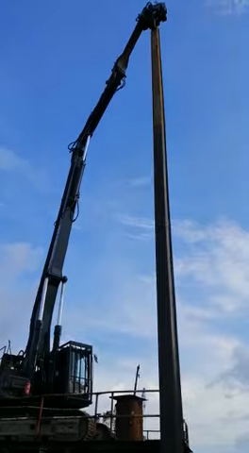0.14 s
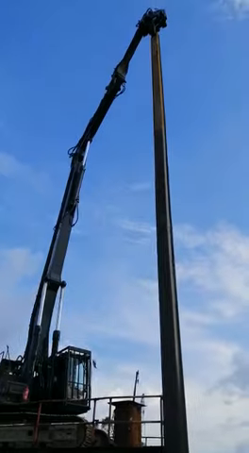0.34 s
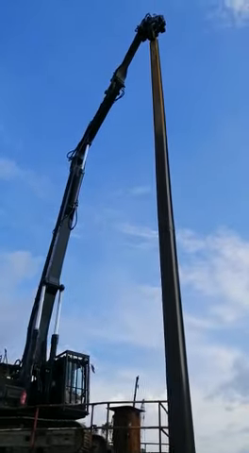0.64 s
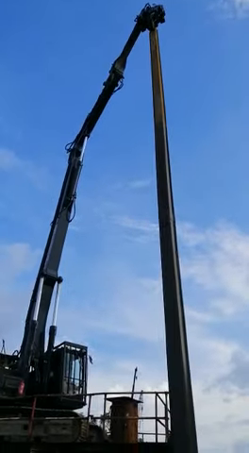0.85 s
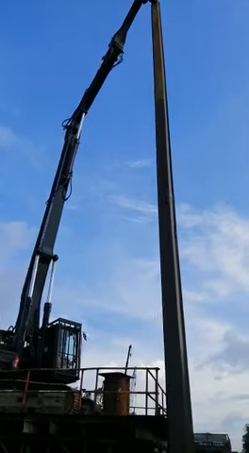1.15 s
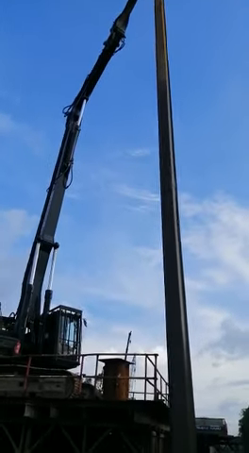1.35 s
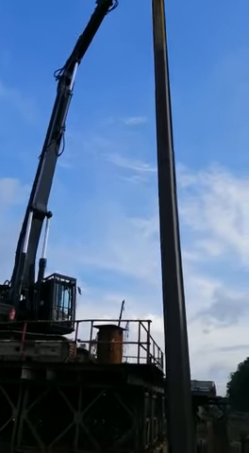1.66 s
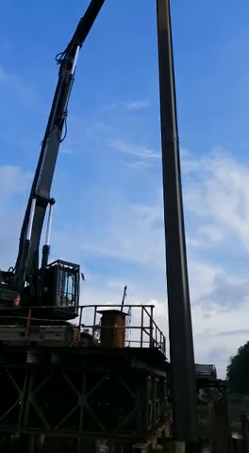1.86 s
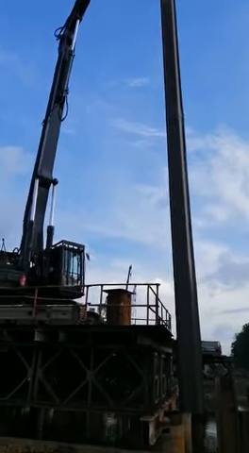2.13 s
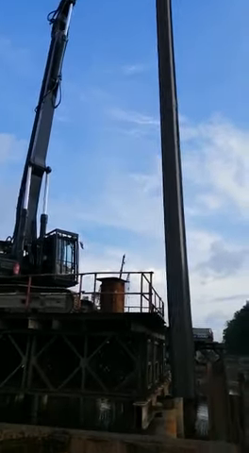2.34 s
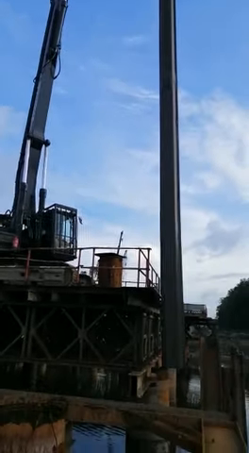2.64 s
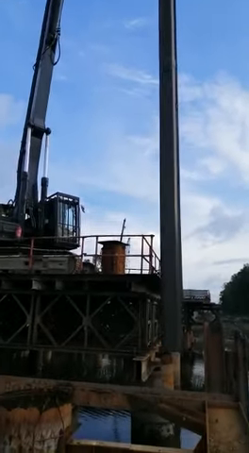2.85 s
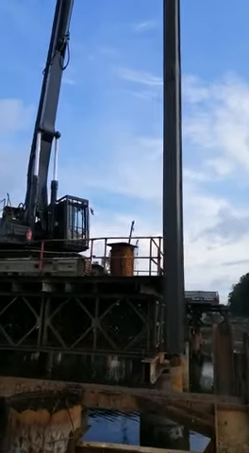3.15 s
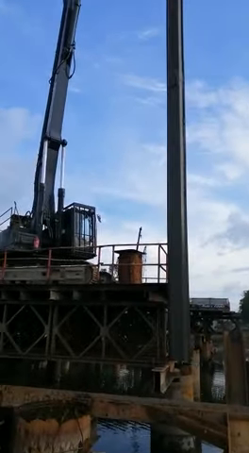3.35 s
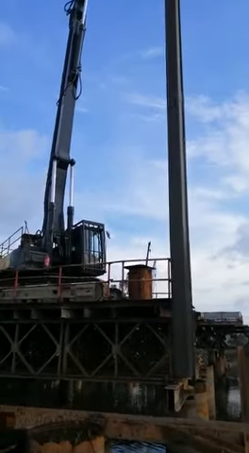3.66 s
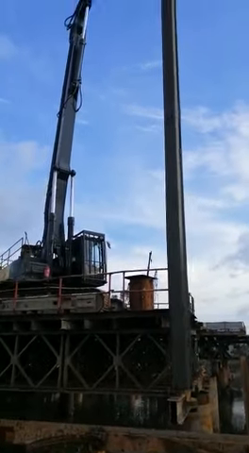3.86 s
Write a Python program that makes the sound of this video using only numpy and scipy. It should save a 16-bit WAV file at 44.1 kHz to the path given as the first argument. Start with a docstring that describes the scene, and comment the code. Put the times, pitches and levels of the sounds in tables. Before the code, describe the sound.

An excavator engine drones outdoors by the water, cutting in abruptly after brief silence; it dips, swells with pump whine and pile-hammer hum, then the whine sags. Stereo microphone on the bank, sound leaning right.

```python
"""The diesel of an excavator throbs and roars while the machine holds a vibrating hammer on a tall
steel pile beside the water, heard from the bank: firing orders as sines, rumble and roar as noise.
The hydraulic pump whines in sines and sags near the end; the hammer hums through the pile in sines.
Steel panels buzz and oil hisses in the valves as coloured noise; narrow resonances add ringing tones.
The microphone opens after a short silence."""
import sys
import numpy as np
from scipy import signal
from scipy.fft import rfft, irfft
from scipy.io import wavfile

SR = 44100
rng = np.random.default_rng(int(sys.argv[2]) if len(sys.argv) > 2 else 0)


def store_wav(level_fs):
    """Save 16-bit WAV to argv[1]."""
    pcm = np.round(np.clip(np.atleast_2d(level_fs), -1, 1) * 32767)
    wavfile.write(sys.argv[1], SR, pcm.T.astype(np.int16))


N = 176400  # 4 s


def from_db(db):
    """Gain of a level in dB."""
    return 10 ** (np.asarray(db) / 20)


def rms_one(x):
    """Scale to rms 1."""
    return x / np.sqrt(np.mean(x ** 2) + 1e-20)


def in_time(rows):
    """Columns of a breakpoint curve, each drawn out to one value per sample."""
    s, *columns = np.transpose(rows)
    t = np.arange(N) / SR
    return [np.interp(t, s, column) for column in columns]


def at_hz(points, hz):
    """A spectrum curve read on a log frequency axis."""
    point_hz, value = np.array(points).T
    return np.interp(np.log(hz), np.log(point_hz), value)


def drift(rate_hz):
    """Slow random wander of rms 1: noise through a double pole, made at 1/40 of the sample rate."""
    step = 40
    r = np.exp(-2 * np.pi * rate_hz * step / SR)
    settle = 2000  # filter start-up, thrown away
    white = rng.standard_normal(N // step + settle + 2)
    slow = signal.lfilter([1], [1, -2 * r, r * r], white)[settle:]
    return np.interp(np.arange(N) / step, np.arange(len(slow)), rms_one(slow))


def placed(db):
    """Left and right gains for a left-minus-right level in dB."""
    return from_db(np.array([db / 2, -db / 2]))


def ringing(modes, swell_db=3.0):
    """Noise through narrow resonances that swell and fade, partly shared by the two sides."""
    out = 0
    for hz, width_hz, db, lean_db in modes:
        r = np.exp(-np.pi * width_hz / SR)
        poles = [1, -2 * r * np.cos(2 * np.pi * hz / SR), r * r]
        shared, *own = rng.standard_normal((3, N))
        rung = signal.lfilter([1, 0, -1], poles, shared + 1.03 * np.array(own))
        swell = from_db(db + swell_db * drift(2.5))
        out = out + swell * placed(lean_db)[:, None] * rms_one(rung)
    return out


# How alike the two sides of the noise are: f/Hz, likeness (0 to 1)
STEREO_LIKENESS = [(60, .95), (240, .93), (470, .85), (930, .62), (1500, .5), (2400, .5), (3700, .35),
                   (5500, .48), (8000, .33), (12000, .15)]
# Stereo tilt of the spectrum, for noise and tones: f/Hz, left minus right level/dB
STEREO_LEAN = [(60, -1.5), (78, 3), (100, -5), (130, -1.0), (170, 1.5), (220, -2.0), (290, -5.5), (370, 0),
               (480, -7.5), (630, 2.5), (810, -11), (1060, -1), (1370, -4), (1780, -7.5), (2310, -7.5),
               (3000, -5), (3890, 7.5), (5050, -8), (6550, -5), (8510, -1), (11000, 10), (14300, 1)]


def noise(colour, course, lag_s, patchy_db, patch_rate, modes=()):
    """Coloured stereo noise in third-octave bands that flicker partly together; the right side lags by lag_s."""
    hz = np.arange(N // 2 + 1) * SR / N + 1e-3  # keeps log(0) away
    low, high = colour[0][0], colour[-1][0]

    # two sides with the wanted likeness and tilt
    alike = np.clip(at_hz(STEREO_LIKENESS, hz), 0, 1)
    mid, side = rfft(rng.standard_normal((2, N)))
    pair = np.sqrt(1 + alike) * mid + np.sqrt(1 - alike) * side * [[1], [-1]]
    pair = pair * placed(at_hz(STEREO_LEAN, hz))

    # colour, steep skirts beyond its ends, and the delay on the right
    skirts = 1 / (1 + (low / hz) ** 16) / (1 + (hz / high) ** 16)
    late = np.exp(-2j * np.pi * hz * lag_s * np.array([[0], [1]]))
    pair = pair * from_db(at_hz(colour, hz)) * np.sqrt(skirts) * late

    # overlapping third-octave bands, each with its own flicker over a common one
    count = int(np.ceil(3 * np.log2(high / low)))
    place = np.clip(3 * np.log2(hz / low), 0, count)
    together = drift(patch_rate / 2)
    out = 0
    for band in range(count + 1):
        share = np.clip(1 - abs(place - band), 0, 1)
        flicker = from_db(patchy_db * (0.83 * together + drift(patch_rate)))
        out = out + flicker * irfft(pair * share, N)

    level_db, side_db = in_time(course)
    out = out / np.sqrt(np.mean(out.mean(axis=0) ** 2))  # the average of the sides at rms 1
    out = out + ringing(modes)
    # the stereo course moves about its own mean, the fixed tilt is already in
    return from_db(level_db) * placed(side_db - side_db.mean()) * out


TONE_LEAD_S = .00008  # the right side runs ahead


def tones(pitch_hz, orders, wobble_db):
    """Sines on multiples of one turning rate, levels wavering; the right side runs slightly ahead."""
    turns = np.cumsum(pitch_hz) / SR
    side_turns = turns + pitch_hz * TONE_LEAD_S * np.array([[0], [1]])
    out = 0
    for multiple, db in orders:
        phase = 2 * np.pi * (multiple * side_turns + rng.random())
        lean = placed(at_hz(STEREO_LEAN, multiple * pitch_hz.mean()))[:, None]
        level = np.sqrt(2) * from_db(db + wobble_db * drift(9.7))  # dB are rms
        out = out + level * lean * np.sin(phase)
    return out


# Exhaust rumble spectrum: f/Hz, level/dB (per Hz)
RUMBLE_SPECTRUM = [(35, -34), (60, -3), (108, -0.5), (167, -0.5), (231, 2.5), (289, -5), (430, -9.5),
                   (520, -31.5), (680, -26), (1140, -120)]
# Exhaust rumble course: t/s, level/dB, left minus right level/dB (about its mean)
RUMBLE_COURSE = [(.42, -30, -2.5), (.9, -35, -2), (1.3, -32.5, -9.5), (1.7, -24.5, -1), (2.3, -27, -4),
                 (2.8, -27.5, -4), (3.4, -27.5, -1), (4.0, -30, -3.5)]


def exhaust_rumble():
    """Low exhaust noise of the diesel, shaped by its spectrum."""
    return noise(RUMBLE_SPECTRUM, RUMBLE_COURSE, lag_s=.00002, patchy_db=-0.57, patch_rate=6.5)


FIRING_HZ, FIRING_WAVER = 92.8, .0012  # firing rate, rms share it wanders by
# Engine orders: multiple of the firing rate, level/dB
FIRING_ORDERS = [(1.0, -1), (1.67, -8), (2.0, -9), (2.58, -4), (3.33, -7.5), (8.0, -17), (8.5, -16.5),
                 (9.0, -12), (10.17, -16.5)]
# Engine throb course: t/s, level/dB
THROB_COURSE = [(.42, -38), (1.0, -36.5), (1.7, -31.5), (2.4, -33.5), (2.9, -39.5), (4.0, -41)]


def diesel_throb():
    """Firing orders as sines on whole and broken multiples of a nearly steady firing rate."""
    firing_hz = FIRING_HZ * (1 + FIRING_WAVER * drift(3.2))
    return from_db(*in_time(THROB_COURSE)) * tones(firing_hz, FIRING_ORDERS, wobble_db=2.5)


# Fan roar spectrum: f/Hz, level/dB (per Hz)
ROAR_SPECTRUM = [(290, -8), (500, -3), (579, -5), (648, -2.5), (706, -5), (860, -4.5), (1030, -8),
                 (1470, -7.5), (1680, -15.5), (2180, -51), (3700, -120)]
# Fan roar course: t/s, level/dB, left minus right level/dB (about its mean)
ROAR_COURSE = [(0.45, -37, -7.5), (0.48, -37, -7.5), (0.94, -40.5, -4.5), (1.38, -37, -12.5),
               (1.58, -32, -6.5), (3.0, -32.5, -7), (3.4, -37, -10), (3.93, -38.5, -10), (4.0, -38.5, -8)]


def fan_roar():
    """Broad mid-range noise of the fan."""
    return noise(ROAR_SPECTRUM, ROAR_COURSE, lag_s=.00006, patchy_db=-0.08, patch_rate=19.0)


# Panel buzz spectrum: f/Hz, level/dB (per Hz)
BUZZ_SPECTRUM = [(990, -22), (1680, -5), (2080, -1), (2220, -1), (3030, -9), (3570, -14.5), (3800, -20),
                 (4940, -16), (8360, -120)]
# Panel buzz course: t/s, level/dB, left minus right level/dB (about its mean)
BUZZ_COURSE = [(0.45, -42, -6.5), (1.02, -45.5, -5), (1.34, -41.5, -9), (1.64, -37.5, -7.5),
               (2.25, -39, -9), (3.36, -42.5, -9), (3.83, -43, -11), (3.93, -43.5, -3.5), (4.0, -44.5, -10)]
# Steel panel resonances riding on the buzz: f/Hz, width/Hz, level/dB (re buzz), left minus right level/dB
PANEL_MODES = [(1310, 10, -17, -3), (1763, 8, -19, -5), (2054, 10, -22, -6), (2150, 4, -14, -6),
               (2258, 8, -22, -6), (2676, 10, -24, -6)]


def panel_buzz():
    """Steel panels as bright noise with narrow resonances that follow its level."""
    return noise(BUZZ_SPECTRUM, BUZZ_COURSE, lag_s=.0003, patchy_db=.9, patch_rate=16.0, modes=PANEL_MODES)


SHAFT_SHARE, RATTLE_DEPTH = .25, .11  # one rattle every four pump strokes


def shaft_rattle():
    """Gain that pulses at a quarter of the pump pitch with a wandering phase, rms 1."""
    pump_hz = in_time(PUMP_COURSE)[0]
    turns = np.cumsum(SHAFT_SHARE * pump_hz) / SR + .08 * drift(6.0)
    return rms_one(1 + RATTLE_DEPTH * np.cos(2 * np.pi * turns))


def engine():
    """Firing orders over exhaust rumble, with fan roar and panel buzz pulsing in the shaft rattle."""
    return exhaust_rumble() + diesel_throb() + (fan_roar() + panel_buzz()) * shaft_rattle()


# Hydraulic pump course: t/s, pitch f/Hz, fundamental level/dB, overtones level/dB
PUMP_COURSE = [(.42, 222.8, -46, -40), (1.0, 222.8, -44, -40), (1.4, 222.8, -35, -35),
               (2.0, 222.8, -32, -36), (2.6, 222.8, -30, -36), (2.95, 221.5, -28, -34),
               (3.04, 218, -30, -50), (3.14, 209, -33, -56), (3.2, 202, -30.5, -58), (3.42, 195, -32, -60),
               (3.52, 192, -39, -62), (4.0, 190, -37, -62)]
# Pump overtones: multiple of the pitch, level/dB
OVERTONES = [(.5, -3), (2, -.8), (3, -12), (4, -12.5), (5, -20), (9, -19.5)]


def pump_whine():
    """Pump strokes as a fundamental and overtones on one wavering pitch that sags near the end."""
    pitch_hz, first_db, over_db = in_time(PUMP_COURSE)
    pitch_hz = pitch_hz * (1 + .004 * drift(5.0))
    fundamental = from_db(first_db) * tones(pitch_hz, [(1, 0)], wobble_db=3.0)
    overtones = from_db(over_db) * tones(pitch_hz, OVERTONES, wobble_db=1.8)
    return fundamental + overtones


HAMMER_HZ, HAMMER_WAVER = 32.5, 0.0061  # turning rate, rms share it wanders by
# Hammer orders: multiple of the turning rate, level/dB
WEIGHT_ORDERS = [(2, -13), (4, -2.5), (10, -8.5), (11, -10.5)]
# Hammer hum course: t/s, level/dB
HUM_COURSE = [(.42, -35.5), (1.2, -39), (1.8, -31.5), (2.6, -30), (3.05, -34), (3.15, -29.5), (3.45, -32),
              (3.6, -38), (4.0, -35)]


def hammer_hum():
    """Spinning weights hum through the pile as sines on multiples of their turning rate."""
    turning_hz = HAMMER_HZ * (1 + HAMMER_WAVER * drift(1.43))
    return from_db(*in_time(HUM_COURSE)) * tones(turning_hz, WEIGHT_ORDERS, wobble_db=2.5)


# Broad hiss spectrum: f/Hz, level/dB (per Hz)
HISS_SPECTRUM = [(2180, -42), (3700, 1), (3830, -8.5), (4430, -1.5), (4800, -6), (5620, 2), (6090, -4.5),
                 (6800, 0), (8520, -9), (9570, -12), (10200, -14.5), (10900, -10.5), (12000, -14),
                 (12900, -21), (13800, -19), (14800, -29)]
# Broad hiss course: t/s, level/dB (before a 3 dB lift), left minus right level/dB (about its mean)
HISS_COURSE = [(0.45, -50, -1), (0.49, -51.5, -1), (0.97, -56, -2), (1.32, -50.5, -5.5), (2.33, -47.5, -3),
               (2.44, -51, -5), (3.0, -50, -5), (3.86, -51, -4.5), (4.0, -52, -3)]


def broad_hiss():
    """Wide treble hiss of the hydraulics, lifted by 3 dB."""
    return from_db(3.0) * noise(HISS_SPECTRUM, HISS_COURSE, lag_s=0.000617, patchy_db=1.2, patch_rate=11.5)


# Valve hiss spectrum: f/Hz, level/dB (per Hz)
VALVE_SPECTRUM = [(2820, -13), (4800, -8.5), (5360, -1), (5450, 0.5), (5690, 4), (5840, 2.5), (6300, -6),
                  (8190, -31), (13900, -120)]
# Valve hiss course: t/s, level/dB, left minus right level/dB (about its mean)
VALVE_COURSE = [(.42, -57, 4), (1.3, -59, -5), (1.6, -49, -6), (2.2, -50, -14), (2.6, -50, -14),
                (3.2, -45.5, -5), (4.0, -51, -17.5)]


def valve_hiss():
    """Oil hissing in the valves as a band of noise."""
    return noise(VALVE_SPECTRUM, VALVE_COURSE, lag_s=.00037, patchy_db=.9, patch_rate=18.0)


# Ground and deck shudder spectrum: f/Hz, level/dB (per Hz)
SHUDDER_SPECTRUM = [(22.0, -2), (34.0, -5), (50.0, -1), (62.0, 1)]
# Shudder course: t/s, level/dB, left minus right level/dB (about its mean)
SHUDDER_COURSE = [(.42, -65, -2), (1.0, -51, -2), (1.7, -42.5, -2), (2.8, -47, -2), (3.4, -43, -2),
                  (4.0, -37.5, -2)]


def ground_shudder():
    """Deep shudder of ground and deck as very low noise without band flicker."""
    return noise(SHUDDER_SPECTRUM, SHUDDER_COURSE, lag_s=0, patchy_db=0.0, patch_rate=6.7)


# Resonances of the ringing tones: f/Hz, width/Hz, level/dB (re course), left minus right level/dB
RINGING_MODES = [(5638, 7, -1, -7), (5625, 30, -5, -7), (5110, 12, -7, -7), (3572, 20, -3, -1),
                 (1424, 8, 2.5, -4), (1519, 8, 1.5, -5)]
# Ringing tones course: t/s, level/dB
RINGING_COURSE = [(1.3, -68), (1.6, -55), (2.0, -56), (2.5, -55), (2.95, -50.5), (3.3, -55), (3.55, -52),
                  (4.0, -54)]


def faint_ringing_tones():
    """Faint ringing tones, two near 1.5 kHz and others at 3.6 to 5.6 kHz: noise through narrow resonances."""
    return from_db(*in_time(RINGING_COURSE)) * ringing(RINGING_MODES, swell_db=1.2)


def scene():
    """All machines together, with the ringing tones."""
    hydraulics = pump_whine() + broad_hiss() + valve_hiss()
    hammer = hammer_hum() + ground_shudder()
    return engine() + hydraulics + hammer + faint_ringing_tones()


START_S, OPENING_S = .4215, .0005  # silence before the microphone opens, length of its ramp
OVERLOAD = .6  # ceiling of the rounded peaks
CUTOFF_HZ = 14950


def record(dry):
    """Peaks are rounded, the microphone opens abruptly and a steep low-pass cuts the top."""
    rounded = OVERLOAD * np.tanh(dry / OVERLOAD)
    opening = np.clip((np.arange(N) / SR - START_S) / OPENING_S, 0, 1)
    low_pass = signal.ellip(12, .5, 70, CUTOFF_HZ, fs=SR, output="sos")
    return signal.sosfilt(low_pass, rounded * opening)


dry = scene()
out = record(dry)
store_wav(out)
```